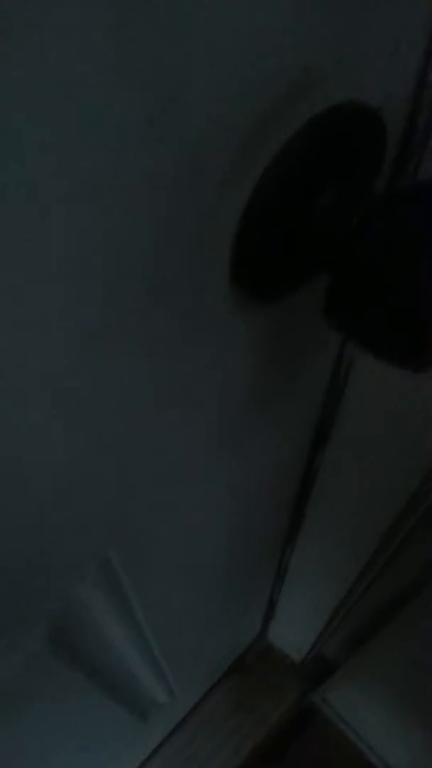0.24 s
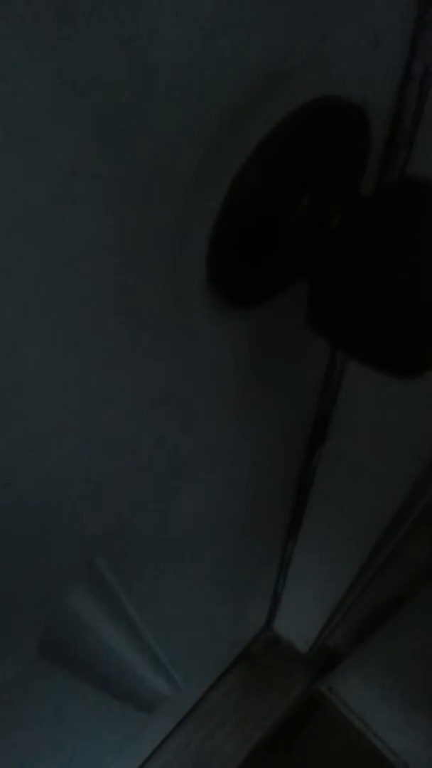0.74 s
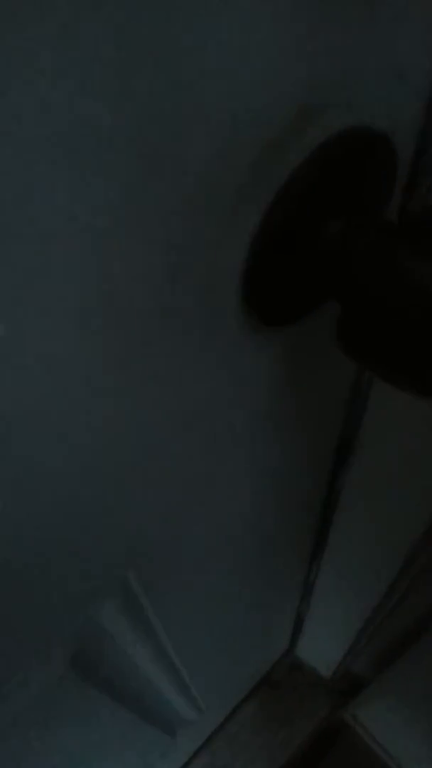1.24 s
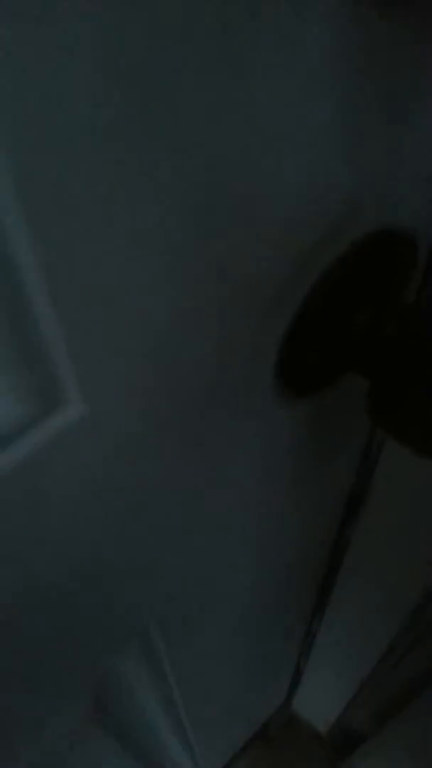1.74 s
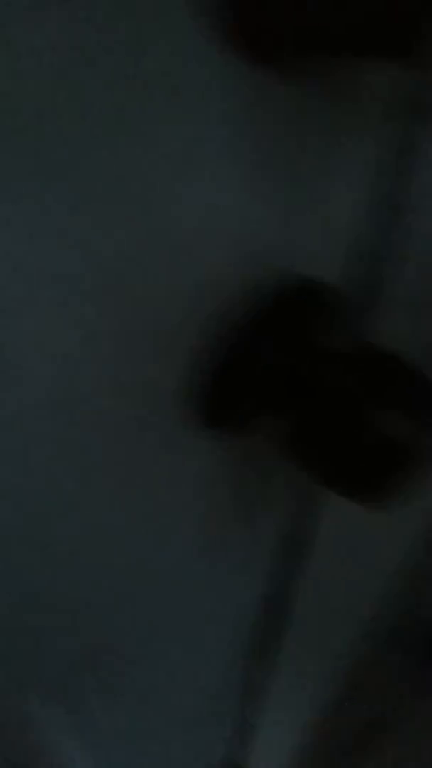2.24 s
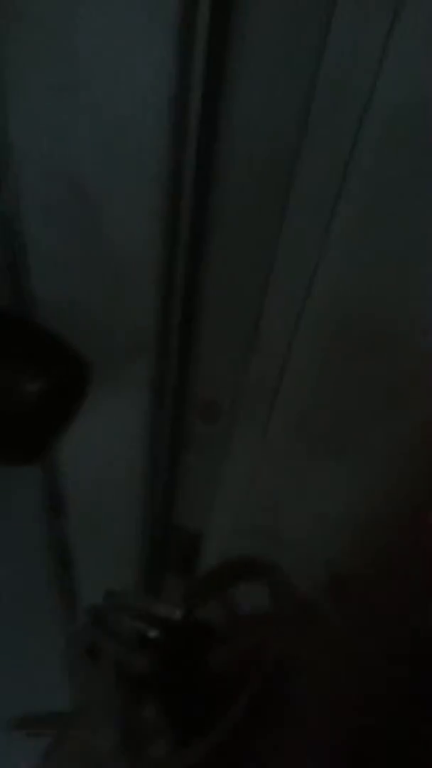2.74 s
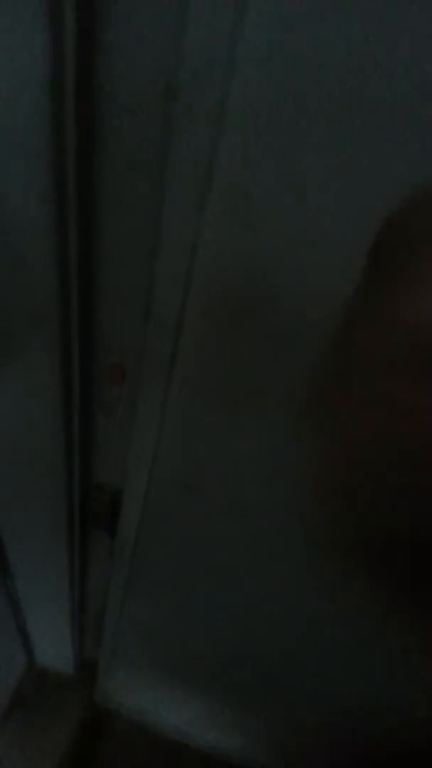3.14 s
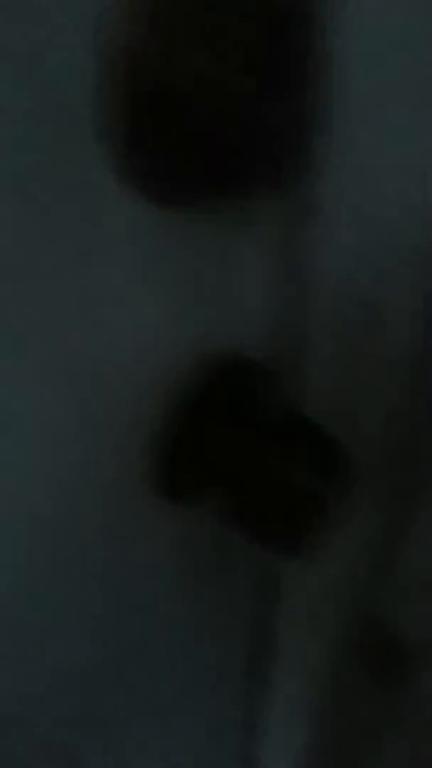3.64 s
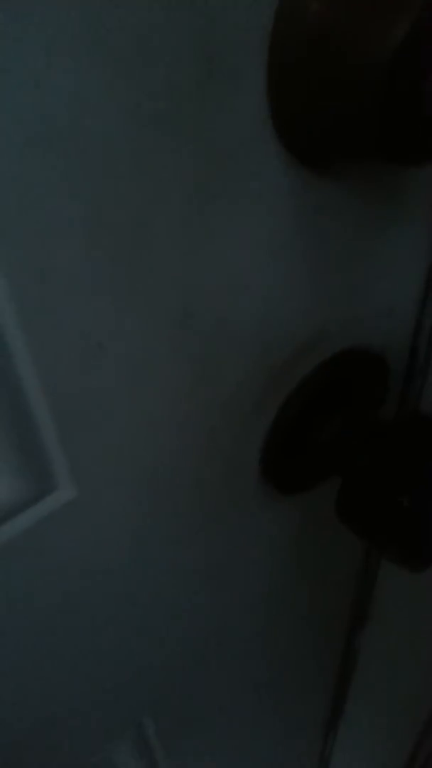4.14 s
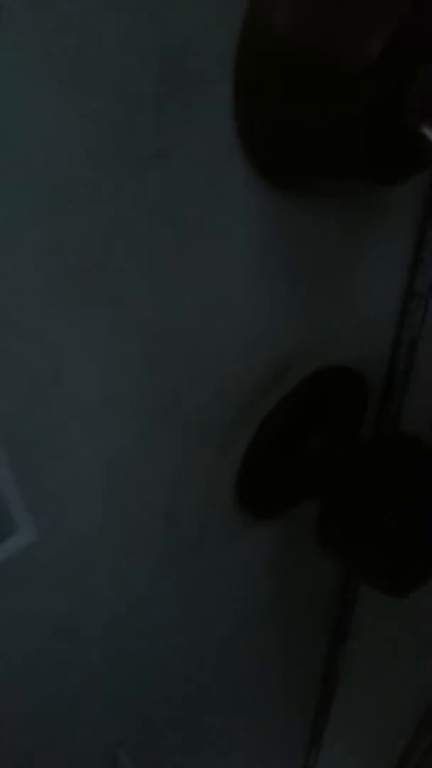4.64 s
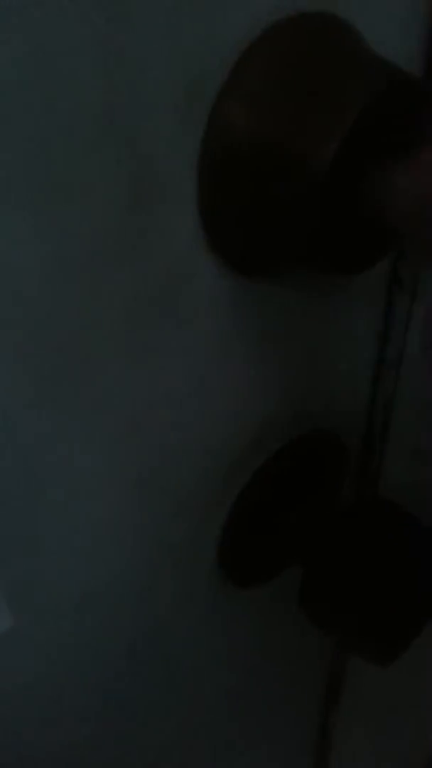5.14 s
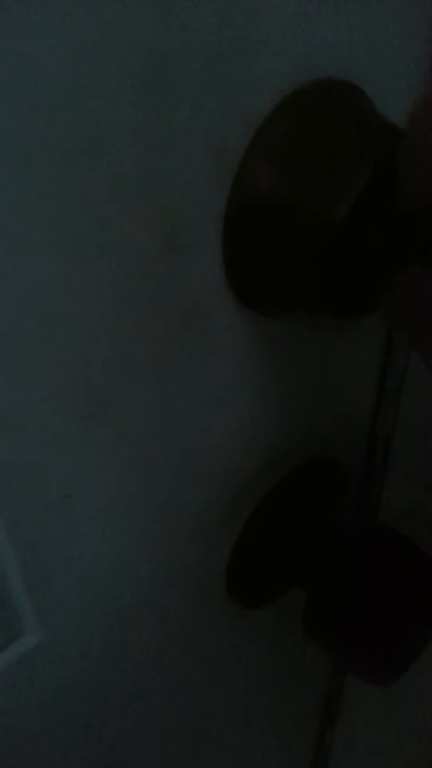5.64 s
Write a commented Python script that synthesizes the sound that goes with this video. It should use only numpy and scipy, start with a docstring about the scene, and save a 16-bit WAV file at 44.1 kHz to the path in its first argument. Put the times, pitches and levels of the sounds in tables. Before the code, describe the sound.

Held keys knock sharply against a metal lock on a heavy wooden door, with short gritty scrapes and low bumps. Around two seconds the bunch swings free in a bright jingle, then only scattered clinks and a faint hand swish remain. A few more raps follow, then busy rattling in another lock ends in a hard bolt crash. Near, dry, wide stereo with slight hallway echo over low soft air.

```python
"""Close stereo pickup in a small hallway: keys work the two locks of a wooden door at arm's length.
Over soft, low air the held key knocks and grinds in the first lock; there is an early dull pop on the right.
The door bumps its frame, the cylinder clunks and loose keys clink and jingle; then the hand swishes away.
The bunch goes to the upper lock, where the bolt snaps back. Ticks and damped modes make the metal,
lower modes and shaped noise the housing and door; the air and the swish are steady coloured noise."""
import sys
import numpy as np
from scipy import signal
from scipy.fft import rfft, irfft, next_fast_len
from scipy.io import wavfile
from scipy.ndimage import uniform_filter1d

SR = 44100
rng = np.random.default_rng(int(sys.argv[2]) if len(sys.argv) > 2 else 0)


def digitize_waveform(pressure):
    """Quantize a signal to 16-bit integers and store it at the path in sys.argv[1].

    Rows of a 2-D input are taken as channels; values are limited to [-1, 1].
    """
    field = np.atleast_2d(pressure).T
    bounded = np.clip(field, -1, 1)
    quanta = np.round(bounded * 32767).astype(np.int16)
    wavfile.write(sys.argv[1], SR, quanta)


N = 260234

# Steady hallway air, relative colour: (frequency [Hz], density [dB per Hz])
AIR_COLOUR = [(30, -47), (60, -5), (120, 0), (300, -10.5), (520, -21), (800, -18), (1700, -25.5),
              (2500, -27), (4000, -26), (7200, -25.5), (8800, -34.5), (14000, -46.5)]
# Key and pins hitting the lock:
# (time [s], metal level [dB], lock housing level [dB], door panel level [dB])
KNOCK_EVENTS = [(0.0262, -20.5, -24.5, -24.5), (0.312, -19.5, -28, -23.5), (0.4282, -31.5, -32, -28.5),
                (0.4778, -16.5, -34, -26.5), (0.4921, -21, -32.5, -32), (0.542, -26, -34, -29),
                (0.6963, -26.5, -40, -22), (0.768, -24, -50, -38), (0.779, -16, -48, -30),
                (0.8028, -20.5, -53, -41), (0.8136, -15.5, -49, -26), (0.831, -17.5, -21.5, -20),
                (1.1301, -15.5, -40, -33.5), (1.1561, -17.5, -35, -27), (1.27, -16.5, -25, -24.5),
                (1.317, -25.5, -29.5, -53), (1.4202, -21, -19, -23), (1.4361, -15.5, -22.5, -29),
                (1.447, -17, -25, -28), (1.4715, -25, -19, -24.5), (1.5263, -26, -28, -28),
                (1.8289, -24, -24, -23.5), (2.257, -17, -21, -24), (2.336, -20.5, -29.5, -30),
                (2.4247, -21, -30, -37), (3.2449, -32.5, -28.5, -42), (3.3038, -17.5, -43, -54),
                (3.405, -15, -33, -55), (3.5658, -29, -36, -50), (4.027, -27, -26, -26.5),
                (4.2189, -33, -31.5, -38), (4.24, -28.5, -28.5, -29), (4.473, -32, -49, -52),
                (4.7762, -21, -26, -32.5), (4.872, -37, -42, -43), (4.957, -31.5, -58, -32),
                (5.0806, -33, -33.5, -33.5), (5.1535, -19, -19.5, -29), (5.197, -23, -27, -22),
                (5.208, -20.5, -17, -53), (5.2835, -25, -26, -41), (5.454, -21.5, -46, -39),
                (5.4689, -21, -49, -36), (5.546, -14, -35, -25.5), (5.573, -23, -38, -31),
                (5.765, -35, -32, -41)]
# The key is pushed or turned in a lock: (start [s], length [s],
# chattering keys level [dB], grinding pins level [dB], rumbling door level [dB])
STROKE_MOVES = [(0.038, 0.01, -44, -51, -40), (0.413, 0.2, -51, -47, -40.5),
                (0.681, 0.043, -25, -33, -22.5), (0.796, 0.067, -23, -29.5, -26.5),
                (0.973, 0.018, -27, -30.5, -29), (1.121, 0.14, -24.5, -33.5, -29.5),
                (1.235, 0.044, -41, -28, -27), (1.415, 0.076, -27.5, -29, -26),
                (1.665, 0.19, -26.5, -37.5, -29.5), (2.24, 0.2, -32.5, -41, -52),
                (3.301, 0.13, -33.5, -36.5, -57), (3.589, 0.0077, -28.5, -33.5, -45),
                (4.914, 0.014, -40.5, -33, -34), (5.114, 0.09, -28.5, -29.5, -36),
                (5.143, 0.065, -22, -30, -29.5), (5.296, 0.066, -22, -31, -36),
                (5.444, 0.069, -29.5, -29, -28), (5.563, 0.067, -20, -23.5, -25),
                (5.758, 0.033, -25.5, -32.5, -32)]
# A dull pop on the right: (time [s], peak level [dB])
POP_EVENTS = [(0.0703, 3.5)]
# The door bumps against its frame: (time [s], level [dB])
BUMP_EVENTS = [(0.281, -25.5), (0.331, -26.5), (1.706, -19), (1.751, -14), (1.789, -33), (4.935, -23),
               (5.597, -47), (5.65, -29.5), (5.808, -27)]
# The lock cylinder takes up its play with a hollow clunk: (time [s], level [dB])
CLUNK_EVENTS = [(.6975, -15.5), (.722, -27), (.86, -26), (1.487, -23.5)]
# Keys hitting each other: (time [s], level [dB], treble lift [dB], ping frequency [Hz])
CLINK_EVENTS = [(0.755, -17.5, 7, 7000), (1.0244, -16, -10, 6840), (1.061, -24.5, -4, 8100),
                (1.098, -17, 15, 7100), (1.1695, -16, 23, 7000), (1.204, -23, 34, 10400),
                (1.732, -21, 4, 6930), (1.8034, -16.5, 17, 12350), (1.9402, -11.5, 3, 5300),
                (1.9455, -17.5, 5, 6700), (1.965, -17.5, 3, 5000), (1.9987, -14, 14, 11190),
                (2.0251, -22, -23, 6660), (2.0667, -16.5, 17, 6770), (2.118, -18, 28, 9770),
                (2.1614, -14, 14, 6470), (2.1958, -12, 17, 11770), (2.214, -18.5, -9, 7500),
                (2.3797, -10.5, 16, 6440), (2.65, -30, 2, 6470), (2.849, -22, 25, 6840),
                (2.8707, -27, 16, 6940), (2.9474, -14, 24, 6740), (3.024, -31.5, 13, 6800),
                (3.1064, -32, -1, 6330), (3.119, -18, 10, 6540), (3.1282, -32, 4, 7300),
                (3.1372, -21.5, 8, 6970), (3.32, -33, 12, 7100), (3.334, -16, 0, 9550),
                (3.3516, -16, -20, 9700), (3.472, -21.5, -29, 6950), (3.589, -26, 2, 6720),
                (3.5947, -17, 8, 9780), (5.3324, -18, 10, 5100), (5.3473, -14.5, 6, 5200),
                (5.4205, -11, 0, 5580)]
# The bunch swings free and jingles: (start [s], length [s], level [dB])
SHAKE_MOVES = [(1.015, 0.053, -19), (1.11, 0.15, -38), (1.868, 0.41, -22), (3.01, 0.21, -42.5),
               (3.315, 0.12, -18), (5.893, 0.016, -25.5)]
# A soft swish as the hand moves away: (time [s], level [dB])
SWISH_LEVEL = [(2.438, -90), (2.54, -37.5), (2.62, -42.5), (2.85, -45)]
# The bolt snaps back:
# (time [s], metal level [dB], bolt level [dB], lock housing level [dB], door panel level [dB])
BOLT_EVENTS = [(5.6104, -4.5, -6.5, -8.5, -14.5)]

# Modes of the keys, before detuning and damping: (frequency [Hz], level [dB], 60 dB decay time [s])
KEY_RESONANCES = [(4200, -6, 0.089), (5600, -2, 0.14), (5800, -23, 0.057), (6550, -1, 0.089),
                  (6920, 11, 0.081), (7540, -5, 0.018), (7860, -17, 0.2), (9130, -11.5, 0.059),
                  (9810, -6, 0.052), (10900, -10.5, 0.095), (11960, -7.5, 0.071), (13030, -6, 0.041),
                  (13600, -12, .05)]
# Modes of the lock housing, before detuning: (frequency [Hz], level [dB], 60 dB decay time [s])
HOUSING_MODES = [(1073, -0.5, 0.14), (1304, -25, .08), (1738, -1, 0.084), (1778, -2.5, 0.17),
                 (1970, -3, 0.13), (2320, -15, 0.066), (2910, -13, 0.089), (3140, 1.5, 0.084),
                 (3482, 8, 0.038), (3943, 12.5, 0.041)]
# Modes of the door panel, before detuning: (frequency [Hz], level [dB], 60 dB decay time [s])
PANEL_MODES = [(123, 3.5, 0.32), (164.5, 8.5, 0.2), (214, -2, 0.28), (256.5, -6.5, 0.35), (400, -7.5, 0.48),
               (482, -22, 0.057), (569.4, -7.5, 0.24), (680, -32, 0.033), (824, -2.5, 0.25)]
# Modes of the cylinder in the wood, before detuning:
# (frequency [Hz], level [dB], 60 dB decay time [s])
CYLINDER_RESONANCES = [(424, -10, 0.093), (516, -4, 0.063), (640, -7, .05), (790, 0, 0.075)]
# Modes of the bolt and its plate, before detuning:
# (frequency [Hz], level [dB], 60 dB decay time [s])
BOLT_PLATE_MODES = [(597, -13, .14), (820, -21, .14), (958, -10, .1), (1184, 1, .085), (1345, 2, .075),
                    (1518, -4, .09), (1735, -5, .08), (1810, -1, .08), (2056, -13, .1)]

# Dense, quickly damped modes of the metal, relative colour: (frequency [Hz], density [dB per Hz])
TICK_COLOUR = [(900, -8), (2200, -3.5), (3600, -3.5), (4800, 2.5), (5800, 8.5), (7000, 8), (8300, -5),
               (10000, -10.5), (12500, -15.5), (15000, -21.5)]
# The same for the lock housing: (frequency [Hz], density [dB per Hz])
HOUSING_COLOUR = [(350, -19.5), (600, -6), (950, -14), (1300, -1), (1780, 1.5), (2400, -8), (3300, -1.5),
                  (4200, -7.5), (5500, -4), (9000, -99)]
# The same for the door panel: (frequency [Hz], density [dB per Hz])
PANEL_COLOUR = [(30, -63), (70, -12), (110, 7), (160, -41), (280, -1), (500, 0), (750, -2), (1100, -11.5),
                (2500, -56)]
# Relative colour of a bump on the frame: (frequency [Hz], density [dB per Hz])
FRAME_COLOUR = [(25, -27), (65, -2), (125, 5), (190, 8), (290, -8), (900, -34)]
# Relative colour of the swish: (frequency [Hz], density [dB per Hz])
FRICTION_COLOUR = [(3500, -13), (5300, -1), (7000, -7), (14000, -15)]

# Left-right likeness: (frequency [Hz], correlation [0 to 1])
STEREO_LIKENESS = [(150, 0.96), (400, 0.71), (1200, 0.13), (2500, 0.086), (7000, 0.057)]
# Left minus right for the door's sounds: (frequency [Hz], level [dB])
DOOR_BALANCE = [(50, -13), (130, -0.5), (260, 0), (1200, 1.5), (2300, 1.5), (5000, 4), (8000, -17.5),
                (13000, -5.5)]
# Left minus right for the air and the swish: (frequency [Hz], level [dB])
AIR_BALANCE = [(50, -4), (500, 2), (2000, 7.5), (7000, -3), (14000, -3)]

AIR_DB = -39
PORT_LAG_S = .0005  # the left microphone port hears the door later
CUTOFF_HZ = 14800
HALL_T60_S = 0.78
RING_SIZE = 8820  # samples in one hit
AGE = np.arange(RING_SIZE) / SR  # seconds since a hit
TIME = np.arange(N) / SR
LEFT_RIGHT = np.array([[1], [-1]])
LEAD_S = .011  # longest gap between the first touch and the blow
# Every hand move swells, holds and dies away; a weaker rattle lingers while the bunch settles
SWELL_DB_PER_S, RELEASE_DB_PER_S = 1300, 498
SHAKE_SETTLE_DB, STROKE_SETTLE_DB, SETTLE_DB_PER_S = -17, -13.5, 73
# A harder knock is brighter: treble lift at the usual strength, and its rise per dB of strength
USUAL_KNOCK_DB, KNOCK_BRIGHT_DB, BRIGHT_PER_DB = -26.5, 2.5, .5
KEY_PAN_DB = 5  # spread of left minus right as the keys swing about
# Ring of the keys against their tick: swinging clear, and held against the lock
CLINK_RING_DB, KNOCK_RING_DB = -4, -5


def from_db(db):
    """Decibels to gain."""
    return 10 ** (np.asarray(db) / 20)


def at_hz(points, hz):
    """Read a table on a log-frequency axis."""
    at, values = np.transpose(points)
    return np.interp(np.log(np.maximum(hz, 1)), np.log(at), values)


def fade(t60):
    """Exponential decay that falls 60 dB in t60 seconds."""
    return from_db(-60 * AGE / max(t60, .001))


def unit_hit(x):
    """Scale a stereo hit to the energy of 10 ms at full level."""
    return x / np.sqrt(np.sum(x ** 2) / (2 * .01 * SR))


def add(out, s, sound):
    """Mix a sound in at a time in seconds."""
    i = int(np.clip(round(s * SR), 0, N - 1))
    out[:, i:i + sound.shape[1]] += sound[:, :N - i]


def treble(hz):
    """Share of a brightness change at each frequency: none below 7 kHz, all above 10 kHz."""
    return np.clip((hz - 7000) / 3000, 0, 1)


def noise(spectrum, size, balance=DOOR_BALANCE, bright_db=0):
    """Coloured stereo noise of rms 1, more alike left and right at low frequencies."""
    hz = np.arange(size // 2 + 1) * SR / size
    mid, side = rfft(rng.standard_normal((2, size)))
    alike = np.clip(at_hz(STEREO_LIKENESS, hz), 0, 1)
    pair = np.sqrt(1 + alike) * mid + np.sqrt(1 - alike) * side * LEFT_RIGHT
    colour_db = at_hz(spectrum, hz) + bright_db * treble(hz)
    colour_db = colour_db + LEFT_RIGHT * at_hz(balance, hz) / 2
    x = irfft(pair * from_db(colour_db), size)
    return x / x.std()


def ring(modes, spread_db, detune, bright_db=0, sustain=1):
    """Struck modes; where the blow lands varies their strengths, which piece is hit their pitch."""
    out = np.zeros((2, RING_SIZE))
    for hz, db, t60 in modes:
        strength, pitch, phase, skew = rng.standard_normal(4)
        level_db = db + spread_db * strength + bright_db * treble(hz)
        gain = from_db(level_db + LEFT_RIGHT * at_hz(DOOR_BALANCE, hz) / 2)
        turn = np.pi * phase + LEFT_RIGHT * skew * (1 - at_hz(STEREO_LIKENESS, hz))
        wave = 2 * np.pi * hz * (1 + detune * pitch) * AGE
        out += gain * fade(t60 * sustain) * np.sin((wave + turn).astype(np.float32))
    return unit_hit(out)


def key_hit(bright_db, ring_db, sustain):
    """A hard tick, a short rattle of damped modes, the hallway's echo and the ring of two keys."""
    envelope = fade(.008) + from_db(-7) * fade(.032) + from_db(-38) * fade(HALL_T60_S)
    tick = unit_hit(noise(TICK_COLOUR, RING_SIZE, bright_db=bright_db) * envelope)
    pair = [ring(KEY_RESONANCES, spread_db=7, detune=.016, bright_db=bright_db, sustain=sustain)
            for _ in range(2)]
    keys = unit_hit(sum(pair))
    pan = from_db(KEY_PAN_DB * rng.standard_normal() * LEFT_RIGHT / 2)
    soft_start = 1 - fade(0.0025)
    return unit_hit(pan * (tick + from_db(ring_db) * keys) * soft_start)


def lock_hit():
    """The housing clacks: damped noise and its ringing modes, with a faint hallway echo."""
    envelope = fade(.055) + from_db(-26) * fade(HALL_T60_S)
    clack = unit_hit(noise(HOUSING_COLOUR, RING_SIZE) * envelope)
    return unit_hit(clack + from_db(-2) * ring(HOUSING_MODES, spread_db=5, detune=.016))


def door_hit():
    """The heavy panel takes a moment to move, then thuds."""
    thud = unit_hit(noise(PANEL_COLOUR, RING_SIZE) * fade(0.12))
    thud = thud + ring(PANEL_MODES, spread_db=3.5, detune=0.0057)
    return unit_hit(thud * (1 - fade(0.0064)))


def grazed(hit):
    """A light first touch comes a few milliseconds before the blow; the result starts LEAD_S early."""
    out = np.zeros((2, RING_SIZE + round(LEAD_S * SR)))
    touch = round(rng.uniform(0, .6) * LEAD_S * SR)
    out[:, touch:touch + RING_SIZE] += from_db(rng.uniform(-28, -12)) * hit
    out[:, -RING_SIZE:] += hit
    return out


def rattle(hits, level_db, per_s, spread_db, run_s):
    """Random small uneven contacts; the same pieces chatter for a short run, then others take over."""
    born = rng.random(N) < per_s / SR
    sizes, stray = rng.standard_normal(N), rng.random(N)
    dealt = (np.arange(N) / (run_s * SR) + stray).astype(int) % len(hits)
    clicks = born * from_db(spread_db * np.clip(sizes, -2, 2)) * rng.choice([-1, 1], N)
    # the hand feeds in a steady power, however it is shared between the contacts
    power = np.maximum(uniform_filter1d(clicks ** 2, size=1500), 0) * .01 * SR
    clicks = clicks / np.sqrt(power + .05) * from_db(level_db)
    out = np.zeros((2, N))
    for i in np.flatnonzero(born):
        add(out, i / SR, clicks[i] * hits[dealt[i]])
    return out


def effort(moves, settle_db):
    """Level in dB over time of hand moves (start, length, dB): swell, hold, release and settling."""
    t, power = np.arange(0, N, 32) / SR, 1e-12
    for s, length, db in moves:
        before, after = np.maximum(s - t, 0), np.maximum(t - s - length, 0)
        dying_db = np.maximum(-RELEASE_DB_PER_S * after, settle_db - SETTLE_DB_PER_S * after)
        power = power + from_db(db - SWELL_DB_PER_S * before + dying_db) ** 2
    return np.interp(TIME, t, 10 * np.log10(power))


def air():
    """The hallway's steady air: noise weighted to the low frequencies."""
    return from_db(AIR_DB) * noise(AIR_COLOUR, next_fast_len(N), AIR_BALANCE)[:, :N]


def knocks():
    """The held key is damped; its blows pass into the housing and the door."""
    out = np.zeros((2, N))
    for s, metal_db, lock_db, door_db in KNOCK_EVENTS:
        bright_db = KNOCK_BRIGHT_DB + BRIGHT_PER_DB * (metal_db - USUAL_KNOCK_DB)
        metal = from_db(metal_db) * key_hit(bright_db, KNOCK_RING_DB, sustain=0.67)
        housing = from_db(lock_db) * lock_hit()
        panel = from_db(door_db) * door_hit()
        add(out, s - LEAD_S, grazed(metal + housing + panel))
    return out


def strokes():
    """The blade grinds over the pins, damped keys chatter on the lock, the door rumbles under the hand."""
    s, length, *levels = np.transpose(STROKE_MOVES)
    chatter_db, grind_db, rumble_db = [effort(zip(s, length, db), STROKE_SETTLE_DB) for db in levels]
    held = [key_hit(rng.normal(6, 2.2), ring_db=-11, sustain=0.86) for _ in range(16)]
    pins = [lock_hit() for _ in range(10)]
    panel = [door_hit() for _ in range(10)]
    chatter = rattle(held, chatter_db, per_s=320, spread_db=9, run_s=0.048)
    grind = rattle(pins, grind_db, per_s=320, spread_db=3.5, run_s=.04)
    rumble = rattle(panel, rumble_db, per_s=130, spread_db=1, run_s=.08)
    return chatter + grind + rumble


def pop():
    """One short pulse with a slow undershoot, on the right only."""
    out = np.zeros((2, N))
    high_pass = signal.butter(2, 90, "high", fs=SR, output="sos")
    pulse = signal.sosfilt(high_pass, fade(0.0036) - fade(0.00044))
    for s, db in POP_EVENTS:
        add(out, s, from_db(db) * pulse / pulse.max() * [[0], [1]])
    return out


def bumps():
    """The whole door is pushed against its frame: deep noise with a soft start."""
    out = np.zeros((2, N))
    for s, db in BUMP_EVENTS:
        bump = noise(FRAME_COLOUR, RING_SIZE) * fade(0.31) * (1 - fade(0.026))
        add(out, s, from_db(db) * unit_hit(bump))
    return out


def clunks():
    """The turning cylinder knocks against the wood that holds it."""
    out = np.zeros((2, N))
    for s, db in CLUNK_EVENTS:
        clunk = ring(CYLINDER_RESONANCES, spread_db=1.5, detune=.008) * (1 - fade(.005))
        add(out, s, from_db(db) * clunk)
    return out


def clinks():
    """Free-hanging keys strike each other; one close pair of modes stands out as a short ping."""
    out = np.zeros((2, N))
    for s, metal_db, bright_db, ping_hz in CLINK_EVENTS:
        close_pair = [(ping_hz, 0, .045), (ping_hz * 1.025, -5, .045)]
        ping = ring(close_pair, spread_db=1, detune=.002) * (1 - fade(0.0013))
        hit = unit_hit(key_hit(bright_db, CLINK_RING_DB, sustain=0.65) + ping)
        add(out, s - LEAD_S, from_db(metal_db) * grazed(hit))
    return out


def shakes():
    """Away from the lock the keys slide together: so many light touches that the ringing never stops."""
    loose = [key_hit(rng.normal(8.5, 4), ring_db=2, sustain=.8) for _ in range(40)]
    level_db = effort(SHAKE_MOVES, SHAKE_SETTLE_DB)
    return rattle(loose, level_db, per_s=700, spread_db=3.5, run_s=.018)


def swish():
    """Smooth, high friction noise as the hand moves away."""
    level_db = np.interp(TIME, *np.transpose(SWISH_LEVEL), left=-np.inf, right=-np.inf)
    return from_db(level_db) * noise(FRICTION_COLOUR, next_fast_len(N), AIR_BALANCE)[:, :N]


def bolt():
    """The bolt hits its stop with a noisy crash, rings its plate, clacks the housing and shakes the door."""
    out = np.zeros((2, N))
    for s, metal_db, bolt_db, lock_db, door_db in BOLT_EVENTS:
        crash = noise(TICK_COLOUR, RING_SIZE, bright_db=1) * fade(0.037) * (1 - fade(0.0026))
        clack = noise(HOUSING_COLOUR, RING_SIZE) * fade(0.095)
        plate = ring(BOLT_PLATE_MODES, spread_db=1, detune=.002) * (1 - fade(.015))
        metal = from_db(metal_db) * unit_hit(crash) + from_db(bolt_db) * unit_hit(plate)
        wood_and_lock = from_db(lock_db) * unit_hit(clack) + from_db(door_db) * door_hit()
        add(out, s, metal + wood_and_lock)
    return out


def scene():
    """The door's sounds reach the right microphone port first; the hallway's air lies under them."""
    left, right = knocks() + strokes() + bumps() + clunks() + clinks() + shakes() + bolt()
    left = np.interp(np.arange(N) - round(PORT_LAG_S * SR), np.arange(N), left)
    return np.array([left, right]) + air() + pop() + swish()


def record(dry):
    """The loudest peaks are rounded, then a steep low-pass cuts the top."""
    rounded = dry / (1 + dry ** 4) ** .25
    low_pass = signal.ellip(10, .3, 70, CUTOFF_HZ, fs=SR, output="sos")
    return signal.sosfilt(low_pass, rounded)


dry = scene()
out = record(dry)
digitize_waveform(out)
```